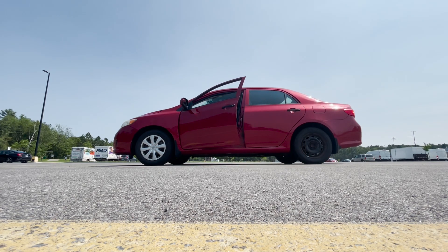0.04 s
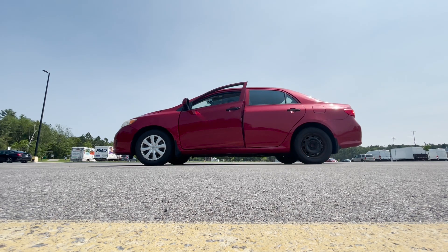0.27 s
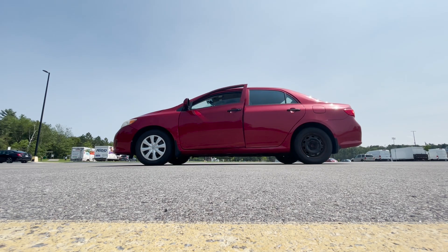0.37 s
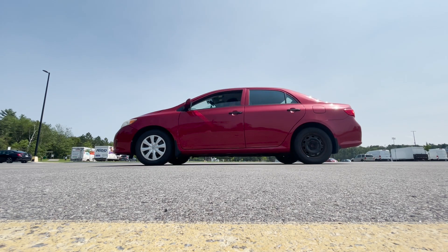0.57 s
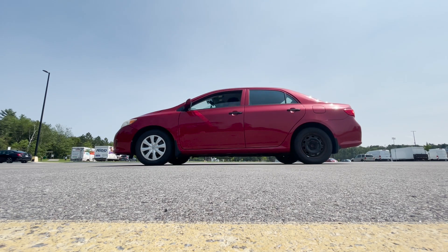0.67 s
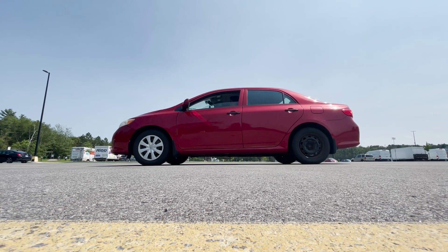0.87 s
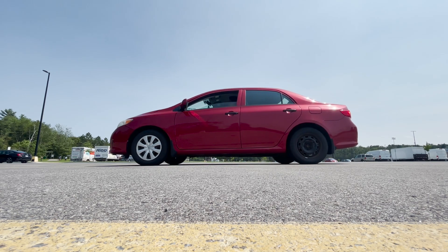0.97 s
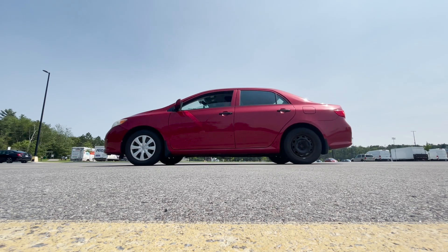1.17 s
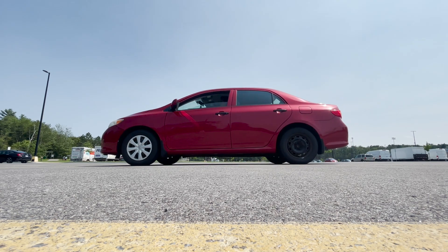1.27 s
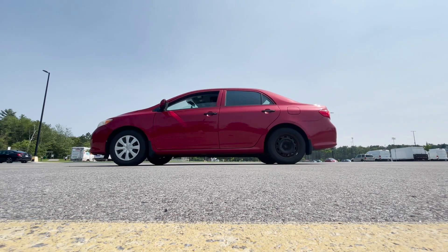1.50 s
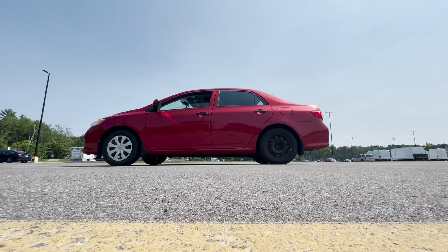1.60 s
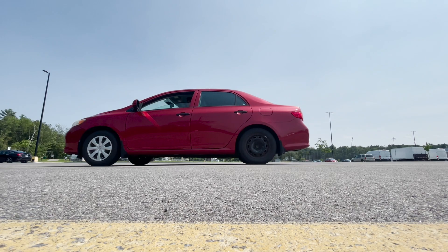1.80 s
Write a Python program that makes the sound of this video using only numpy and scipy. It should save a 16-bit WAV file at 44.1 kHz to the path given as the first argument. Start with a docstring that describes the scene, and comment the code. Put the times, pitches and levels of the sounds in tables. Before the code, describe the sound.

A car door slams shut across an open parking lot, then the engine revs up briefly

```python
"""A car door slams across an open parking lot: latch cracks, ringing panel noise and a boom of sagging pitch.
The car's engine then revs up and eases back: a firing tone and its orders, noisy roar and valve ticks.
Wind buffets the microphone as puffs of falling pitch over lumpy rumble, equal in both channels.
Far traffic hums as wide coloured noise, and a faint high tone sounds briefly."""
import sys
import numpy as np
from scipy.fft import rfft, irfft, next_fast_len
from scipy.io import wavfile
from scipy.ndimage import map_coordinates

SR = 44100
rng = np.random.default_rng(int(sys.argv[2]) if len(sys.argv) > 2 else 0)


def waveform_to_disk(signal):
    """Save audio, clipped to [-1, 1], as 16-bit WAV at the path in sys.argv[1]."""
    frames = np.transpose(np.atleast_2d(signal))
    scaled = np.clip(frames, -1, 1) * 32767
    samples = np.round(scaled).astype(np.int16)
    wavfile.write(sys.argv[1], SR, samples)


N = 81585
T = np.arange(N) / SR  # seconds

# Far road noise. Each row: frequency in Hz, level per Hz in dB.
TRAFFIC_SPECTRUM = [(100, -5.5), (500, 4.5), (1200, 2), (2000, -7.5), (4000, -21.5), (7000, -25.5),
                    (9500, -32.5), (11000, -46), (13500, -37.5), (15700, -56)]
# Far road noise over time. Each row: time in seconds, body level in dB, treble level in dB.
TRAFFIC_LEVELS = [(0, -44.5, -63), (.58, -44, -63), (.82, -45, -57.5), (1.0, -45, -61)]

# Wind puffs at the microphone. Each row: start in seconds, nominal level in dB, first pitch in Hz,
# length in seconds to half amplitude (a puff dies out at twice that).
WIND_PUFFS = [(0.0, -28.5, 91, 0.02), (0.2, -26, 202, 0.031), (0.281, -23.5, 240, 0.023),
              (0.351, -23.5, 345, 0.014), (0.363, -21.5, 195, 0.023), (0.394, -21.5, 196, 0.0091),
              (0.4073, -15, 727, 0.0032), (0.412, -16, 124, 0.015), (0.428, -20, 71, 0.023),
              (0.464, -22, 186, 0.026), (0.57, -23.5, 121, 0.025), (0.904, -32.5, 233, 0.024),
              (0.966, -30.5, 114, 0.036), (0.989, -29, 225, 0.017), (1.017, -28, 131, 0.035),
              (1.099, -28, 114, 0.018), (1.78, -34.5, 54.2, 0.11)]
# Buffeting under the puffs. Each row: time in seconds, level in dB before the wind's band filter.
BUFFET_LEVELS = [(0, -43), (.3, -33), (.55, -30.5), (.8, -42), (1.85, -44.5)]
# Colour of the buffeting. Each row: frequency in Hz, level per Hz in dB.
BUFFET_SPECTRUM = [(15, -47), (40, -4), (70, 2.5), (150, -8), (300, -22), (600, -32.5)]
PUFF_SAG, PUFF_RISE = 1.04, 0.22  # octaves lost per length, rise as a share of the length
PUFF_ROUGH, GRIT_DB = 0.26, -10  # unevenness of the swell, turbulence against the puff tone
PUFF_TOP_HZ = 950

# Faint high tone. In order: start in seconds, end in seconds, pitch in Hz, peak level in dB.
WHISTLE_TONE = (1.178, 1.25, 4170, -62)

# Engine. Each row: time in seconds, firing rate in Hz, low tone level in dB, roar level in dB.
ENGINE_REVS = [(1.1, 58, -68, -60), (1.2, 63.05, -39, -56.5), (1.3, 69.23, -48.5, -55),
               (1.37, 77.26, -37.5, -49), (1.435, 83.4, -31.5, -43.5), (1.47, 91.86, -41, -42),
               (1.55, 106.9, -48, -40), (1.65, 111.4, -50.5, -42), (1.85, 101.5, -56, -50.5)]
# Colour of the roar. Each row: frequency in Hz, level per Hz in dB.
ROAR_SPECTRUM = [(100, -9), (200, -3.5), (450, 4.5), (1500, -0.5), (2200, -6), (3800, -3.5), (6000, -11.5),
                 (8000, -12.5), (15700, -21.5)]
# Ring of the valve gear. Each row: frequency in Hz, width in Hz, level in dB.
VALVE_MODES = [(3450, 470, 4.5), (5150, 200, -5), (6120, 280, -0.5)]
CLATTER = 0.16  # depth of the roar's pulse, once a shaft turn
VALVE_DB, VALVE_SCATTER_DB = -10.5, 3  # level added to every mode, unsteadiness of the ticks
# Shaft orders: level over the roar, loss per doubling of order, unsteadiness.
ORDER_DB, ORDER_FALL_DB, ORDER_SWAY_DB = -3, 2, 2.5
ENGINE_LEAD_S = 0.00018  # the left port hears the engine first

# Contacts of the closing door. Each row: start in seconds, panel level in dB,
# metal tick level in dB, panel 60 dB decay in seconds.
DOOR_CONTACTS = [(0.598, -30, -64, 0.072), (0.61, -24, -49, 0.11), (0.618, -28, -35, 0.029),
                 (0.642, -26.5, -45, 0.067), (0.657, -27.5, -47, 0.057), (0.6619, -30, -31, 0.0043),
                 (0.681, -30.5, -62, 0.034), (0.691, -34, -44.5, 0.054), (0.701, -33.5, -73, 0.048),
                 (0.717, -31.5, -60, 0.042), (0.77, -41, -51.5, 0.08), (0.7927, -38, -44, 0.0029),
                 (0.954, -38, -78, 0.03)]
# Resonances of the door skin. Each row: frequency in Hz, width in Hz, level in dB.
PANEL_MODES = [(419, 76, 1), (1100, 250, -3), (2410, 720, -14)]
# Broad noise of the panel. Each row: frequency in Hz, level per Hz in dB.
WASH_SPECTRUM = [(200, 0.5), (1200, -6.5), (1800, -26.5), (4500, -23), (6000, -33.5), (10000, -55)]
# Latch metal. Each row: frequency in Hz, level per Hz in dB.
TICK_SPECTRUM = [(2000, -39), (4500, 9), (6500, 6), (13000, -5.5), (15700, 3.5)]
# Cabin boom. Each row: time in seconds, pitch in Hz, level in dB.
CABIN_BOOM = [(.612, 212.1, -29), (.65, 159.4, -22), (.70, 115.3, -27.5), (.75, 76, -27.5), (.775, 58, -26),
              (.80, 45, -34.5)]
# Where the door stands. Each row: frequency in Hz, left over right in dB.
DOOR_BALANCE = [(1300, 0.5), (2400, -3.5)]
RISE_SHARE = .07  # rise of a contact as a share of its panel decay
WASH_DB, CRACK_DB = 5, 14  # wash against the panel level, crack against the tick level
DULLS_DB_PER_S, DULL_HZ = 109, 1730  # the wash loses treble from the third contact on
BOOM_ROUGH, BOOM_OCTAVE_DB = .3, -11  # unevenness of the boom, its second partial
THUD_HZ, THUD_DB = 246, -6  # top of the rumble under the boom, its level against the boom tone

# Stereo width. Each row: frequency in Hz, gain of the side signal in dB.
SIDE_GAIN = [(150, -72), (380, -24), (550, -2), (1200, 0), (12000, 1.5), (12600, -23.5)]
DIP_HZ, DIP_DB = 5580, -8.5  # a narrow dip of the microphone
TOP_HZ = 15741


def amp(db):
    """Decibels to amplitude."""
    return 10 ** (np.asarray(db) / 20)


def unit(x):
    """Scale to rms 1."""
    return x / np.sqrt(np.mean(x ** 2) + 1e-20)


def along(points, hz):
    """Read (Hz, value) points on a log frequency axis."""
    f, v = np.transpose(points)
    return np.interp(np.log(hz + 1), np.log(f + 1), v)


def curves(rows):
    """One value per sample for each column after the time."""
    s, *cols = np.transpose(rows)
    return [np.interp(T, s, c) for c in cols]


def wobble(rate):
    """A smooth random curve, rate knots a second."""
    return map_coordinates(rng.standard_normal(int(N * rate / SR) + 4), [T * rate])


def filtered(x, response):
    """x times a complex response of frequency."""
    m = next_fast_len(N + SR // 4)
    return irfft(rfft(x, m) * response(np.fft.rfftfreq(m, 1 / SR)), m)[..., :N]


def noise(spectrum):
    """Two unrelated coloured noises of rms 1."""
    return unit(filtered(rng.standard_normal((2, N)), lambda hz: amp(along(spectrum, hz))))


def resonant(table):
    """Causal response of (Hz, width Hz, dB) resonances, alternating in sign."""
    def response(f):
        total = 0
        for k, (centre, width, db) in enumerate(table):
            damping = 1j * f * width
            total = total + (-1) ** k * amp(db) * damping / (centre ** 2 - f ** 2 + damping)
        return total
    return response


def shaken(envelope, response):
    """Two noises under an envelope, then through a response; rms 1 at envelope 1."""
    drive = rng.standard_normal((2, N))
    return filtered(envelope * drive, response) / np.std(filtered(drive, response))


def rumble(top_hz):
    """Low noise of rms near 1, rolling off below 50 Hz and above top_hz."""
    return shaken(0.98, lambda f: f ** 2 / (f ** 2 + 50 ** 2) / (1 + (f / top_hz) ** 3))[0]


def swell(s, rise, t60):
    """Linear rise from s, then exponential fall of 60 dB in t60."""
    t = T - s
    return np.clip(t / rise, 0, 1) * amp(-60 * np.clip(t - rise, 0, None) / t60)


def ports(pair, lead, side_db=0):
    """Mid, and a side of a quarter-cycle lead of the mid (lead: share, sign = port) and scattered sound."""
    a = np.clip(lead, -1, 1)
    turned = filtered(pair[0], lambda hz: 1j + 0 * hz)
    side = amp(side_db) * (a * turned + np.sqrt(1 - a * a) * pair[1])
    return np.array([pair[0] + side, pair[0] - side])


def traffic():
    """Far road noise spread wide; its treble level moves apart from its body."""
    body_db, treble_db = curves(TRAFFIC_LEVELS)
    pair = noise(TRAFFIC_SPECTRUM) * amp(0.35 * wobble(10.43))
    treble = filtered(pair, lambda hz: 1 / (1 + (2600 / (hz + 1)) ** 4))
    spread = amp(body_db) * (pair - treble) + amp(treble_db) * unit(treble)
    return ports(spread, lead=0.35, side_db=0.5)


def wind():
    """Each puff is a short eddy whose pitch sags, with turbulence; lumpy rumble lies beneath."""
    lumps = amp(2.4 * wobble(25))
    out = amp(curves(BUFFET_LEVELS)[0]) * unit(lumps * noise(BUFFET_SPECTRUM)[0])
    grit = rumble(top_hz=220)
    wander, flutter = wobble(70), wobble(89.7)
    start_turns = rng.random((len(WIND_PUFFS), 1))
    for (s, db, start_hz, length), start_turn in zip(WIND_PUFFS, start_turns):
        u = np.clip((T - s) / length, 0, 2)
        hz = start_hz * 2 ** (-PUFF_SAG * u + .25 * wander)
        rise = np.sin(np.pi / 2 * np.clip(u / PUFF_RISE, 0, 1)) ** 2
        fall = np.cos(np.pi * u / 4) ** 2
        shape = rise * fall * (1 + PUFF_ROUGH * flutter)
        eddy = np.sin(2 * np.pi * (np.cumsum(hz * (u > 0)) / SR + start_turn))
        out = out + amp(db) * shape * (eddy + amp(GRIT_DB) * grit)
    return filtered(out, lambda hz: hz ** 2 / (hz ** 2 + 20 ** 2) / (1 + (hz / PUFF_TOP_HZ) ** 6))


def whistle():
    """A short, slightly unsteady high tone with 10 ms fades."""
    start, end, hz, db = WHISTLE_TONE
    on = np.clip(np.minimum(T - start, end - T) * 100, 0, 1)
    return amp(db) * on * np.sin(2 * np.pi * hz * T + wobble(36.0))


def valve_gear(turn):
    """Each ringing mode is struck once a shaft turn, at an unsteady moment and force."""
    ticks = []
    for _ in VALVE_MODES:
        pulse = np.exp(2 * np.cos(turn / 2 + wobble(40)))
        ticks.append(pulse * amp(VALVE_SCATTER_DB * wobble(50.07)))
    return sum(amp(VALVE_DB + mode[2]) * shaken(unit(tick), resonant([mode]))
               for tick, mode in zip(ticks, VALVE_MODES))


def engine():
    """A firing tone with its orders, a roar that clatters once a shaft turn, and valve ticks."""
    hz, tone_db, roar_db = curves(ENGINE_REVS)
    turn = 2 * np.pi * np.cumsum(hz * (1 + 0.01655 * wobble(17))) / SR  # firing phase, two a shaft turn
    tone = np.sqrt(2) * amp(tone_db + 3.5 * wobble(23.97)) * np.sin(turn)
    orders = 0
    for k in range(3, 13):
        order_db = ORDER_DB - ORDER_FALL_DB * np.log2(k) + ORDER_SWAY_DB * wobble(9.1)
        orders = orders + amp(order_db) * np.sin(k * turn / 2 + wobble(8.08))
    gate = unit(1 + CLATTER * unit(np.exp(np.cos(turn / 2)) * amp(11 * wobble(40.7))))
    valves = valve_gear(turn)
    direct = (gate * noise(ROAR_SPECTRUM) + valves)[0]
    scattered = gate * noise(ROAR_SPECTRUM) + valves[::-1]

    def port_lead(f):
        return np.exp(1j * np.pi * f * ENGINE_LEAD_S * np.array([[1], [-1]]))

    roar = filtered(direct, port_lead) + amp(-2.0) * scattered
    fade_in = np.clip((T - ENGINE_REVS[0][0]) * 10, 0, 1)
    return fade_in * (tone + amp(roar_db) * (orders + roar))


def latch_crack():
    """The hard first instant of each contact: one impulse coloured by the latch metal."""
    blows = np.zeros(N)
    for s, _, db, _ in DOOR_CONTACTS:
        blows[round(s * SR)] = amp(db + CRACK_DB)
    return filtered(blows, lambda hz: unit(amp(along(TICK_SPECTRUM, hz))))


def door_panel():
    """Each contact shakes the door skin into resonances and broad wash, and ticks the latch."""
    shake = sum(amp(db) * swell(s, RISE_SHARE * t60, t60) for s, db, _, t60 in DOOR_CONTACTS)
    tick = sum(amp(db) * swell(s, RISE_SHARE * t60, .5 * t60) for s, _, db, t60 in DOOR_CONTACTS)
    wash = amp(WASH_DB) * shaken(shake, lambda hz: amp(along(WASH_SPECTRUM, hz)))
    bright = filtered(wash, lambda hz: 1 / (1 + (DULL_HZ / (hz + 1)) ** 4))
    dulling = amp(-DULLS_DB_PER_S * np.clip(T - DOOR_CONTACTS[2][0], 0, None))
    wash = wash - bright + bright * dulling
    return shaken(shake, resonant(PANEL_MODES)) + wash + tick * noise(TICK_SPECTRUM) + latch_crack()


def cabin_boom():
    """The cabin air booms with falling pitch: two rough partials over a low thud."""
    hz, db = curves(CABIN_BOOM)
    turn = 2 * np.pi * np.cumsum(hz * (1 + .12 * wobble(58.86))) / SR
    octave = amp(BOOM_OCTAVE_DB + 3.2 * wobble(40)) * np.sin(2 * turn + wobble(30))
    tone = unit((np.sin(turn) + octave) * (1 + BOOM_ROUGH * wobble(70)))
    fade_in = np.clip((T - CABIN_BOOM[0][0]) / 0.018, 0, 1)
    fade_out = np.clip((CABIN_BOOM[-1][0] - T) / 0.0085, 0, 1)
    return amp(db) * fade_in * fade_out * (tone + amp(THUD_DB) * rumble(THUD_HZ))


def door():
    """The panel and latch placed between the ports, with the boom equal in both."""
    placed = ports(door_panel(), lead=0.44, side_db=-2)
    balanced = filtered(placed, lambda f: amp(along(DOOR_BALANCE, f) * [[.5], [-.5]]))
    return balanced + cabin_boom()


def scene():
    """Everything that reaches the microphone, background first."""
    return traffic() + wind() + whistle() + engine() + door()


def record(dry):
    """Stereo narrows toward mono in the bass and at the top; a treble dip, and nothing from TOP_HZ up."""
    mid, side = (dry[0] + dry[1]) / 2, (dry[0] - dry[1]) / 2
    side = filtered(side, lambda hz: amp(along(SIDE_GAIN, hz)))

    def microphone(hz):
        dip = amp(DIP_DB * np.exp(-((hz - DIP_HZ) / 200) ** 2))
        return dip * (hz < TOP_HZ)

    return filtered(np.array([mid + side, mid - side]), microphone)


dry = scene()
out = record(dry)
waveform_to_disk(out)
```